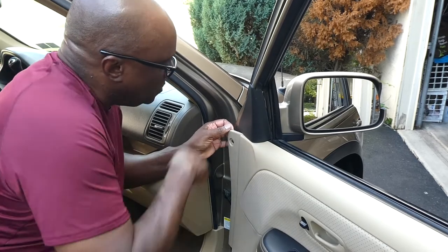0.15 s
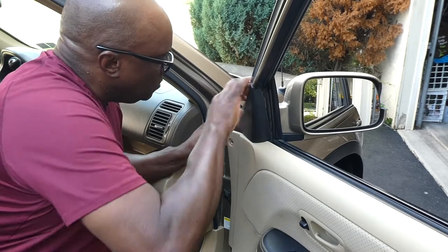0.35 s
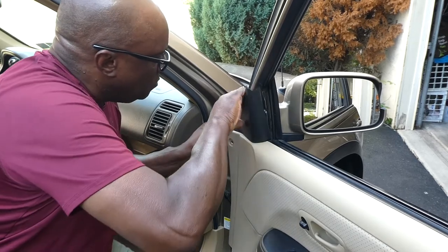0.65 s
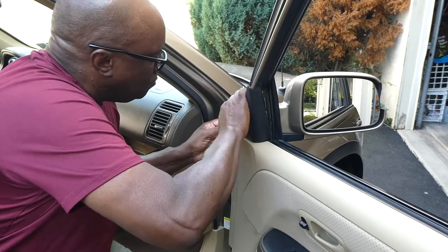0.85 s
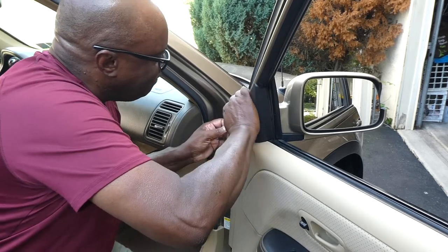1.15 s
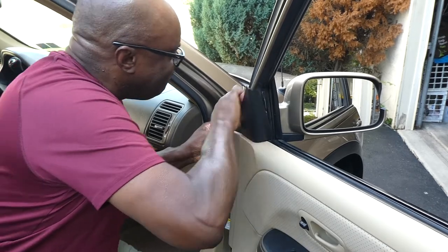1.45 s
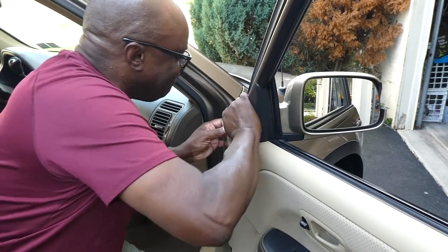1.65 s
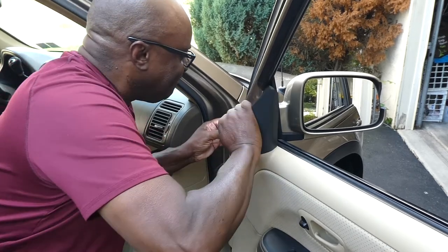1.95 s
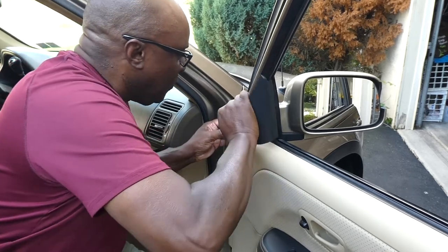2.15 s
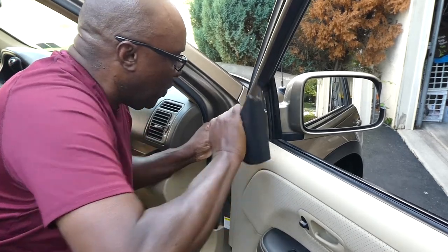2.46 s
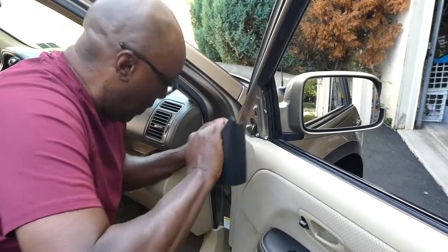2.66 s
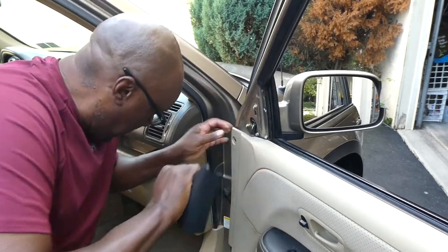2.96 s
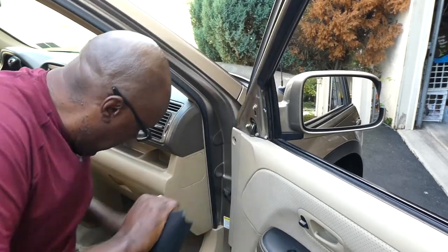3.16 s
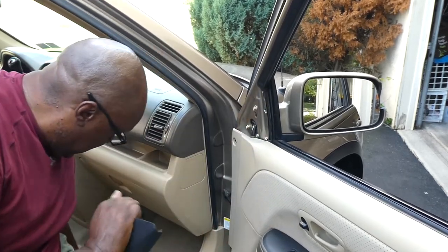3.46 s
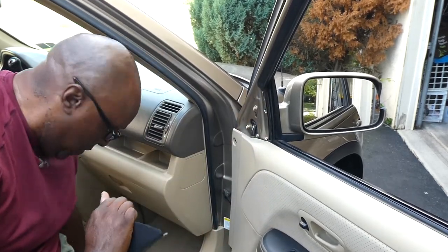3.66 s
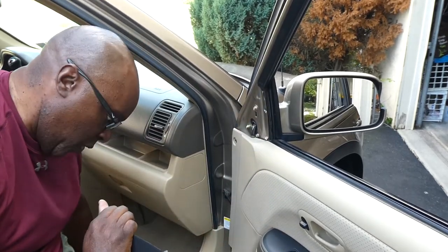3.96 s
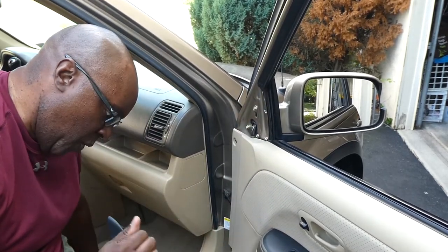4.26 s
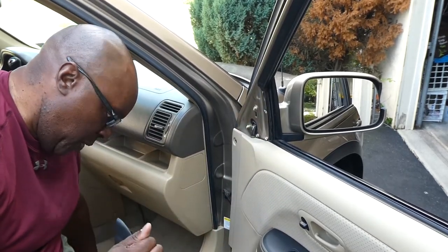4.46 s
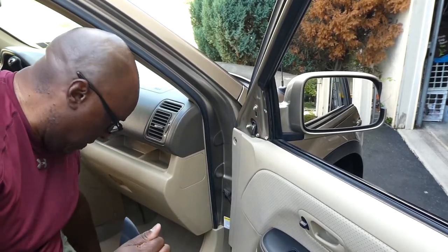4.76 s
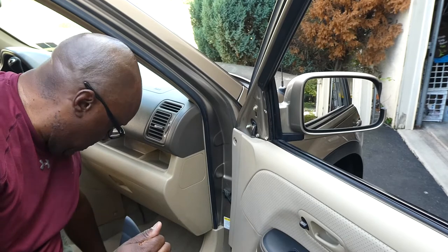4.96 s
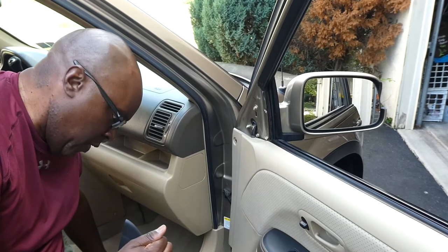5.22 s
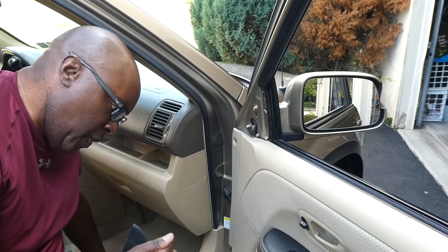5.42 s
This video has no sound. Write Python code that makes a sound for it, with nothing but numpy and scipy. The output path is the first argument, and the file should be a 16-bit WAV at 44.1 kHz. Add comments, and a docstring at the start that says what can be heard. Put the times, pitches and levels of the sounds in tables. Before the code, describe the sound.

Plastic trim is worked off a car door with hollow knocks, faint scrapes and one loud snap, then creaks and small tool clinks outdoors.

```python
"""Trim cover pried off a car door

A plastic cover is worked loose from an open car door on a driveway: knocks, scrapes, a loud snap, creaks.
Knocks, creaks and clinks are damped modes; ticks are noise bursts; scrapes are coloured trains of tiny slips.
A hollow part groans as it is dragged, things thud on the car floor, a small piece skips, a tool clinks.
An insect sings in pulses over an outdoor wash; cabin and house walls echo, the walls loudest for the snap."""
import sys
import numpy as np
from scipy import signal
from scipy.fft import rfft, irfft
from scipy.io import wavfile

SR = 44100
rng = np.random.default_rng(int(sys.argv[2]) if len(sys.argv) > 2 else 0)


def materialize(psi):
    """Save the field psi as 16-bit PCM at rate SR to the path in sys.argv[1].

    A 1-D psi becomes a single channel; in a 2-D psi each row is a channel.
    """
    bounded = np.clip(np.atleast_2d(psi).T, -1, 1)
    quanta = np.round(bounded * 32767).astype(np.int16)
    wavfile.write(sys.argv[1], SR, quanta)


N = 246519

# Blows. Each row: start in seconds, door thump in dB, cover clack in dB, clip tick in dB,
# resonance of the struck spot in Hz.
KNOCKS = [(0.0,-14,-20,-35,1450), (0.5398,-25,-8,-36,1180), (0.643,-30.5,-23.5,-33.5,1100),
          (0.7428,-22,-14,-27,1740), (0.805,-50,-29,-36.5,2020), (0.897,-23,-24.5,-36.5,1170),
          (0.91,-25.5,-15.5,-42,1220), (1.021,-33.5,-28,-41,1660), (1.136,-39.5,-29,-33.5,1870),
          (1.4802,-61,-28,-26.5,1870), (1.5,-37,-23.5,-44,1780), (1.5385,-42,-14,-52,1200),
          (1.5631,-42,-11.5,-46,1420), (1.7532,-11.5,-6,-20.5,1580), (1.833,-33,-20,-46,1400),
          (1.868,-27,-19.5,-45,1390), (2.28,-60,-34,-22.5,1640), (2.4774,-39.5,-38,-27.5,1480),
          (2.844,-30.5,-29.5,-59,730), (2.926,-33,-31,-33,1730), (2.9596,-32,-22.5,-29.5,2250),
          (2.9655,-23.5,-34,-50,750), (4.143,-31,-39,-37,800), (4.981,-42,-36,-50,1350)]
# Things set down on the car floor. Each row: start in seconds, thud in dB, clack in dB (before a high-pass).
BUMPS = [(0.2146,-2,-6), (0.2285,-15.5,-27), (0.2395,-18.5,-36), (3.559,-24.5,-38), (3.579,-25,-30.5),
         (3.592,-25,-33)]
# Slips of plastic under a firm grip. Each row: start in seconds, level in dB.
CREAKS = [(3.0939,-23), (3.116,-21.5), (3.1294,-23.5), (3.144,-25), (3.154,-27.5), (3.1772,-29),
          (3.1886,-19.5), (3.201,-21), (3.2324,-12.5), (3.2988,-18)]
# Touches of a small tool. Each row: start in seconds, level in dB, extra level of the main ringing mode in dB,
# treble tilt in dB per octave.
CLINKS = [(0.158,-35,-5,-14), (0.229,-23,2,-8), (0.286,-35.5,7,-13), (4.717,-27,-6,0), (4.731,-31,-6,0),
          (4.766,-28,-5,-1), (4.785,-27,-8,-3.5), (4.827,-27.5,-2,0.5), (4.842,-18.5,5.5,-2),
          (4.8545,-26,-2,-1.5), (4.8615,-22,1,0), (4.87,-25.5,-5,0), (4.9258,-14.5,8,4.5),
          (4.993,-30,14,-14), (5.115,-30,8,0.5)]
# Fingers and plastic edges sliding. Each row: start in seconds, length in seconds, rub in dB, hiss in dB.
STROKES = [(0.47, 0.12, -50, -57.5), (0.586, 0.06, -48, -51.5), (0.713, .065, -44.5, -50.5),
           (1.149, 0.02, -41, -55.5), (1.356, 0.075, -44, -56), (1.448, 0.052, -43, -48),
           (1.502, 0.11, -45.5, -69), (1.733, 0.14, -37, -58.5), (2.695, .16, -50.5, -70),
           (2.862, 0.07, -47.5, -62), (4.094, 0.051, -45.5, -48.5), (5.0, 0.16, -61, -56.5)]
# Palm shifting on the loose cover. Each row: start in seconds, length in seconds, level in dB.
GRIPS = [(2.79, .065, -44), (2.954, 0.051, -41), (3.112, .13, -44.5)]
# Stutter of the dragged hollow part. Each row: start in seconds, level in dB.
DRAG_SLIPS = [(.062, -20.5), (.073, -20), (.082, -22), (.089, -19), (.103, -18.5), (.135, -25)]

# Modes of the skipping piece. Each row: frequency in Hz, relative level in dB, T60 in seconds.
PIECE_MODES = [(1900, -4, .018), (2850, -3, .026), (5950, -3, .022), (9900, -2, .018)]
PEG_MODES = [(380, -9, .013), (660, 3, .01), (830, 2, .014), (1400, -8, .013), (1740, 4, .01),
             (2190, -8, .014), (2600, -3, .01)]
# Modes of the hollow part. Each row: frequency in Hz, relative level in dB, T60 in seconds.
HOLLOW_MODES = [(465, 0, .016), (820, -1, .014), (1380, 0, .012), (1600, -8, .008)]
# Modes of the car floor. Each row: frequency in Hz, relative level in dB, T60 in seconds.
FLOOR_MODES = [(330, -5, .013), (420, 0, .014), (520, -2, .014)]
# Modes of the things set down. Each row: frequency in Hz, relative level in dB, T60 in seconds.
LOAD_MODES = [(950, -2, .012), (1165, -3, .014), (1560, 2, .009), (2350, -12, .008)]
# Modes of the door panel. Each row: frequency in Hz, relative level in dB, T60 in seconds.
DOOR_MODES = [(127, -16, 0.093), (211, 1, 0.026), (334, -0.5, 0.027), (410, 4, 0.025), (493, 8.5, 0.018),
              (637, 7.5, 0.017)]
# Modes of the cover. Each row: frequency in Hz, relative level in dB, T60 in seconds.
COVER_MODES = [(753, 3.5, 0.011), (942, -5, 0.022), (1167, -1.5, 0.019), (1374, -8.5, 0.018),
               (1550, -5.5, 0.018), (1800, -2.5, 0.013), (2200, -1.5, 0.016), (2466, -7.5, 0.015),
               (3080, -7, 0.012)]
# Modes of the slipping plastic. Each row: frequency in Hz, relative level in dB, T60 in seconds.
SLIP_MODES = [(360, -13, .018), (560, -7, .011), (750, 1, .013), (930, -.5, .012), (1350, -11, .007),
              (2130, -11, .007), (2550, -14, .006)]
# Modes of the tool, main ringing mode first. Each row: frequency in Hz, relative level in dB, T60 in seconds.
TOOL_MODES = [(2038, -1.5, .037), (1830, -7, .015), (2680, -3, .015), (2920, -4, .014), (3570, -3.5, .018),
              (3830, -3, .017), (5650, -10, .018), (8650, -8, .016), (10300, -10, .016)]

# Clip tick spectrum. Each row: frequency in Hz, relative level in dB per Hz.
CLIP_TICK = [(1000, -5), (2800, 7), (4500, -1), (6300, 5.5), (9500, 5.5), (12500, -2), (16000, -14.5)]
# Snap crack spectrum. Each row: frequency in Hz, relative level in dB per Hz.
CRACK = [(120, -12), (400, -4), (800, -0.5), (1100, -4), (2700, -4.5), (4500, -14), (9000, -32)]
# Dull part of a scrape. Each row: frequency in Hz, relative level in dB per Hz.
RUB = [(60, -19), (200, 6), (500, 4.5), (1100, 2), (2000, 3), (3000, -11.5), (4500, -27), (8000, -17.5),
       (15000, -37)]
# Bright part of a scrape. Each row: frequency in Hz, relative level in dB per Hz.
HISS = [(1500, -6.5), (3000, 10), (4500, -2.5), (7000, 1), (10500, 3.5), (13000, -9), (16000, -12)]
# Distant outdoor wash. Each row: frequency in Hz, relative level in dB per Hz.
AIR = [(60, -19), (125, -2.5), (250, 1), (420, 4), (900, 0), (1500, -3), (2200, -3.5), (3200, -12),
       (4800, -17.5), (8000, -20.5), (9700, -17), (11500, -27), (15500, -32.5)]
# Left-right likeness of the wash. Each row: frequency in Hz, likeness from 0 to 1.
AIR_SAME = [(250, 0.038), (2000, 0.45)]
# Decay of the house-wall echo. Each row: frequency in Hz, T60 in seconds.
YARD_T60 = [(150, 0.43), (500, .78), (3500, 0.79), (8000, 0.35), (15000, 0.067)]
# Colour of the house-wall echo. Each row: frequency in Hz, gain in dB.
YARD_COLOUR = [(100, 2), (450, 2), (1300, -1), (1750, -7), (3600, .5), (9000, -7), (15000, -45)]

HIT_T_S = np.arange(6000) / SR
DOOR_PAN_DB, COVER_PAN_DB, TICK_PAN_DB = 3, -2.5, 1  # left minus right
PROMPT_HZ, BEND_LAG_S = 1802, .0032  # bending waves below this pitch travel slowly and lag
INSECT_DB, INSECT_STOP_S, INSECT_FADE_S = -61, 4.61, 0.0053
INSECT_HZ, INSECT_PULSES_PER_S = 8250, 106
WARM_UP_HZ, WARM_UP_DB = 222, 3  # the song starts this much lower and softer
WARM_UP_S, SETTLE_S = .38, .05
AIR_DB = -49.5
GROAN_DB, GROAN_STOP_S = -28.5, .075
PRESS_SHARE, RELEASE_S = 0.42, 0.013  # a stroke builds over this share of its length
SNAP_S, SNAP_DB, CRACK_DB, SNAP_TICK_DB = 1.7391, 4.5, -1, -12.5
PULL_OUT_S, BARB_DB, BARB_HZ = .138, -21, 1480  # top level and mid pitch of the barbs
BOUNCE_S, BOUNCE_GAP_S, BOUNCE_DB, BOUNCE_LOSS_DB = 4.101, .0157, -16, 7.5
SHIELDED_DB = -10
EDGE_HZ = 16000


def amp(db):
    """Decibels to gain."""
    return 10 ** (np.asarray(db) / 20)


def unit(x):
    """Scales to rms 1."""
    return x / np.sqrt(np.mean(x ** 2) + 1e-20)


def peaked(x):
    """Scales to an envelope peak of 1."""
    return x / abs(signal.hilbert(x)).max()


def read(points, hz):
    """Reads a spectrum on a log-frequency axis."""
    point_hz, value = np.transpose(points)
    return np.interp(np.log(hz + 1), np.log(point_hz), value)


def colour(x, spectrum):
    """Filters by a spectrum."""
    size = x.shape[-1]
    gain = amp(read(spectrum, np.fft.rfftfreq(size, 1 / SR)))
    return irfft(rfft(x) * gain, size)


def wander(hz):
    """Slow chance of rms 1, up to the given rate."""
    slow = np.fft.rfftfreq(N, 1 / SR) < hz
    return unit(irfft(rfft(rng.standard_normal(N)) * slow, N))


def place(x, pan_db):
    """Mono to stereo; the pan is left minus right."""
    return x * amp([[pan_db / 2], [-pan_db / 2]])


def add(mix, s, sound):
    """Mixes a stereo sound in at time s."""
    part = mix[:, max(round(s * SR), 0):][:, :sound.shape[1]]
    part += sound[:, :part.shape[1]]


def held(t, stop_s, release_s):
    """Full until the stop, then an exponential release."""
    return np.exp(-np.maximum(t - stop_s, 0) / release_s)


def pressure(t, start_s, length_s):
    """A stroke builds, holds and lets go."""
    build = np.clip((t - start_s) / (PRESS_SHARE * length_s), 0, 1)
    return build * held(t, start_s + length_s, RELEASE_S)


def ring(modes, rise_s, scatter=0.438, uneven_db=5.5, lag_s=0):
    """Damped modes built up over the contact time, uneven at every blow; with a lag the low ones arrive late."""
    hz, db, t60_s = np.transpose(modes)[:, :, None]
    phase, chance = rng.standard_normal((2, len(modes), 1))
    delay_s = lag_s * np.maximum(np.sqrt(PROMPT_HZ / hz) - 1, 0)
    t = np.maximum(HIT_T_S - delay_s, 0)
    decay = np.exp(-np.log(1000) * t / t60_s)
    waves = amp(db + uneven_db * chance) * decay * np.sin(2 * np.pi * (hz * t + scatter * phase))
    build = 1 - np.exp(-(t / rise_s) ** 2)
    return peaked((waves * build).sum(0))


def tick(spectrum, t60_s):
    """Countless high modes: a burst of noise that dies at once."""
    noise = colour(rng.standard_normal(len(HIT_T_S)), spectrum)
    return peaked(noise * np.exp(-np.log(1000) * HIT_T_S / t60_s))


def spot(x, hz, ratio):
    """The struck spot passes best the modes within a ratio of its own resonance."""
    ratio = max(ratio, 1.05)
    band = signal.butter(1, [hz / ratio, hz * ratio], "band", fs=SR, output="sos")
    return peaked(signal.sosfilt(band, x))


def chatter(sound, within_s, db, count):
    """A loose contact touches again a few times, more weakly and at random."""
    contacts = np.zeros(len(sound))
    contacts[0] = 1
    when, size = rng.random((2, count))
    contacts[(when * within_s * SR).astype(int) + 1] = amp(db) * size
    return peaked(signal.fftconvolve(sound, contacts)[:len(sound)])


def tail(t60, rise_s, same=1.0):
    """Dense reflections, left energy 1, whose bands die at their own speed."""
    noise = rng.standard_normal((3, SR))
    same = np.clip(same, 0, 1)
    pair = np.sqrt(same) * noise[0] + np.sqrt(1 - same) * noise[1:]
    hz, t, z = signal.stft(pair, SR, nperseg=128)
    decay = np.exp(-np.log(1000) * t / read(t60, hz)[:, None])
    taps = signal.istft(z * decay, SR, nperseg=128)[1][:, :SR]
    taps = taps * (1 - np.exp(-(np.arange(SR) / SR / rise_s) ** 2))
    return taps / np.linalg.norm(taps[0])


def convolve(x, taps):
    """Passes x through a stereo response."""
    return signal.fftconvolve(x, taps, axes=1)[:, :N]


def knocks(door_pitch=0.4):
    """Each blow thumps the door, rings the cover and ticks the clips; the struck spot tunes door and cover."""
    out = np.zeros((2, N))
    for s, thump_db, clack_db, tick_db, hz in KNOCKS:
        door = ring(DOOR_MODES, rise_s=0.002, scatter=0.14, lag_s=BEND_LAG_S)
        thump = amp(thump_db) * spot(door, door_pitch * hz, ratio=1.45)
        cover = ring(COVER_MODES, rise_s=0.0007, scatter=0.31, uneven_db=3, lag_s=BEND_LAG_S)
        clack = amp(clack_db) * spot(cover, hz, ratio=1.28)
        click = amp(tick_db) * tick(CLIP_TICK, t60_s=.036)
        add(out, s, place(thump, DOOR_PAN_DB) + place(clack, COVER_PAN_DB) + place(click, TICK_PAN_DB))
    return out


def dragging(rub_db=0, release_s=0.033):
    """A hollow part slides, groaning at its lowest mode and rubbing; the glide breaks up into separate slips."""
    t = np.arange(N) / SR
    groan = unit(np.sin(2 * np.pi * HOLLOW_MODES[0][0] * t + .85 * wander(50)))
    body = ring(HOLLOW_MODES, rise_s=.002, uneven_db=1)
    rub = unit(signal.fftconvolve(rng.standard_normal(N), body)[:N])
    level = amp(GROAN_DB) * held(t, GROAN_STOP_S, release_s)
    glide = unit((groan + amp(rub_db) * rub) * amp(3.5 * wander(110)))
    out = place(level * glide, pan_db=0.0)
    for s, db in DRAG_SLIPS:
        slip = ring(HOLLOW_MODES, rise_s=.001, scatter=.1, uneven_db=2)
        add(out, s, place(amp(db) * slip, pan_db=2.0))
    return out


def insect(uneven=0.3, rasp_rad=1.3, sag_hz=280):
    """Wing strokes, leaning early and late in turn, each one sagging high note; leaves scatter it."""
    t = np.arange(N) / SR
    cold = .5 - .5 * np.tanh((t - WARM_UP_S) / SETTLE_S)
    level = amp(INSECT_DB - WARM_UP_DB * cold) * held(t, INSECT_STOP_S, INSECT_FADE_S)
    strokes = np.cumsum(INSECT_PULSES_PER_S * (1 + .003 * wander(8))) / SR
    within = strokes % 1 - .5
    swing = np.exp(-(within / .42) ** 2) * (1 + uneven * np.cos(np.pi * strokes))
    turns = np.cumsum(INSECT_HZ - WARM_UP_HZ * cold - sag_hz * within) / SR
    note = np.sin(2 * np.pi * turns + rasp_rad * wander(60))
    song = level * unit(swing * note * amp(1.2 * wander(100)))
    return song + amp(-9) * convolve(song[None], tail([(1000, .05)], rise_s=.003))


def air(swell_db=-0.2):
    """Far traffic and foliage: coloured, gently swelling noise, partly alike in both channels."""
    a, b = rfft(rng.standard_normal((2, N)))
    same = np.clip(read(AIR_SAME, np.fft.rfftfreq(N, 1 / SR)), 0, 1)
    pair = irfft(np.array([a, same * a + np.sqrt(1 - same ** 2) * b]), N)
    return amp(AIR_DB + swell_db * wander(8.0)) * unit(colour(pair, AIR))


def surroundings(free, covered, cabin_db=-11.5, yard_db=-14.5):
    """Cabin answers at once; house walls return a long tail, shielded by hands and car body except for the snap."""
    cabin_t60 = [(150, 0.12), (600, 0.09), (2500, 0.077), (10000, 0.03)]  # Hz, s
    cabin = amp(cabin_db) * tail(cabin_t60, rise_s=0.0021, same=0.59)
    uneven = unit(amp(2.2 * wander(90)))[:SR]
    yard = amp(yard_db) * tail(YARD_T60, rise_s=0.014, same=0.56) * uneven
    near = convolve(free + covered, cabin)
    far = convolve(free + amp(SHIELDED_DB) * covered, colour(yard, YARD_COLOUR))
    return near + far


def clinks(tick_db=-5.5):
    """The tool rattles, more loosely when touched softly; each touch reweighs and detunes its modes."""
    out = np.zeros((2, N))
    hz, mode_db, t60_s = np.transpose(TOOL_MODES)
    main = np.arange(len(hz)) == 0
    for s, db, free_db, tilt_db in CLINKS:
        shifted_hz = hz * (1 + np.where(main, .007, .013) * rng.standard_normal(len(hz)))
        touch_db = mode_db + free_db * main + tilt_db * np.log2(hz / hz[0])
        body = ring(np.transpose([shifted_hz, touch_db, t60_s]), rise_s=.0005, uneven_db=2.5)
        sound = body + amp(tick_db + tilt_db) * tick(CLIP_TICK, t60_s=.034)
        loose = chatter(sound, within_s=.011, db=min(-2, -28 - db), count=3)
        add(out, s, place(amp(db) * loose, pan_db=0.0))
    return out


def bumps(floor_hz=260):
    """Things set down on the carpeted floor: a short clack and a slower, dead thud, high-passed."""
    out = np.zeros((2, N))
    for s, thud_db, clack_db in BUMPS:
        thud = ring(FLOOR_MODES, rise_s=.005, scatter=.04, uneven_db=1.5)
        clack = ring(LOAD_MODES, rise_s=.002, scatter=.2, uneven_db=2)
        add(out, s, place(amp(thud_db) * thud + amp(clack_db) * clack, pan_db=2.5))
    return signal.sosfilt(signal.butter(4, floor_hz, "high", fs=SR, output="sos"), out)


def scraping(grains_per_s=1500, spread_db=1.0):
    """Under each stroke, tiny slips of uneven size excite the plastic."""
    size = amp(spread_db * np.minimum(rng.exponential(1, N), 4)) * rng.standard_normal(N)
    grains = size * (rng.random(N) < grains_per_s / SR)
    slips = grains + 0.21 * rng.standard_normal(N)
    rub, hiss = unit(colour(slips, RUB)), unit(colour(slips, HISS))
    t, out = np.arange(N) / SR, np.zeros(N)
    for start_s, length_s, rub_db, hiss_db in STROKES:
        out += pressure(t, start_s, length_s) * (amp(rub_db) * rub + amp(hiss_db) * hiss)
    return place(out, pan_db=-0.6)


def snap(count=14):
    """The main clip lets go with a broad crack that rings its peg; then the barbed peg crackles out of its hole."""
    out = np.zeros((2, N))
    peg = amp(SNAP_DB) * ring(PEG_MODES, rise_s=.003, scatter=.1, uneven_db=1)
    crack = amp(CRACK_DB) * tick(CRACK, t60_s=.024)
    click = amp(SNAP_TICK_DB) * tick(CLIP_TICK, t60_s=.024)
    add(out, SNAP_S, place(peg + crack + click, COVER_PAN_DB))
    for when, size, where in rng.random((count, 3)):
        barb_hz = BARB_HZ * 2 ** (where - .5)
        barb = spot(ring(COVER_MODES, rise_s=.0005), barb_hz, ratio=1.5)
        add(out, SNAP_S + PULL_OUT_S * when ** .5, place(amp(BARB_DB) * size * barb, COVER_PAN_DB))
    return out


def gripping(low_hz=290, high_hz=780):
    """The palm shifts on the loose cover: a dull, uneven band of noise."""
    t = np.arange(N) / SR
    band = signal.butter(2, [low_hz, high_hz], "band", fs=SR, output="sos")
    rub = unit(signal.sosfilt(band, rng.standard_normal(N)) * amp(2 * wander(100)))
    level = sum(amp(db) * pressure(t, start_s, length_s) for start_s, length_s, db in GRIPS)
    return place(rub * level, pan_db=1.5)


def creaks(dull_share=0.16):
    """Single stick-slip jumps, damped by the hand; the softer the slip, the weaker its high modes."""
    out = np.zeros((2, N))
    hz, mode_db, t60_s = np.transpose(SLIP_MODES)
    loudest_db = max(db for s, db in CREAKS)
    octaves_up = np.maximum(np.log2(hz / hz[mode_db.argmax()]), 0)
    for s, db in CREAKS:
        dulled_db = dull_share * (loudest_db - db) * octaves_up
        modes = np.transpose([hz, mode_db - dulled_db, t60_s])
        slip = ring(modes, rise_s=.002, scatter=.08, uneven_db=2)
        add(out, s, place(amp(db) * slip, pan_db=2.0))
    return out


def bounces(count=3):
    """A small hard piece drops and skips evenly, weaker each time, ticking and ringing briefly."""
    out = np.zeros((2, N))
    for k in range(count):
        body = amp(-2.0) * ring(PIECE_MODES, rise_s=0.00064)
        click = amp(-7) * tick([(1500, -15), (9500, 6), (16000, 2.0)], t60_s=0.045)
        level = amp(BOUNCE_DB - k * BOUNCE_LOSS_DB)
        add(out, BOUNCE_S + k * BOUNCE_GAP_S, place(level * (body + click), pan_db=2.5))
    return out


def scene(radiate_hz=118):
    """The work at the door and inside the car, its echoes and the garden."""
    radiate = signal.butter(2, radiate_hz, "high", fs=SR, output="sos")  # small parts radiate little bass
    free = signal.sosfilt(radiate, snap())
    handling = knocks() + dragging() + scraping() + gripping() + creaks()
    objects = clinks() + bumps() + bounces()
    covered = signal.sosfilt(radiate, handling + objects)
    return free + covered + surroundings(free, covered) + insect() + air()


def record(dry):
    """The recorder overloads at full scale, as on the snap; then a linear-phase low-pass limits the band."""
    clipped = np.clip(dry, -1, 1)
    low_pass = signal.firwin(255, EDGE_HZ, window=("kaiser", 9), fs=SR)
    return signal.oaconvolve(clipped, low_pass[None], "same")


dry = scene()
out = record(dry)
materialize(out)
```